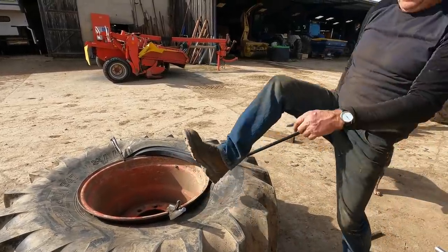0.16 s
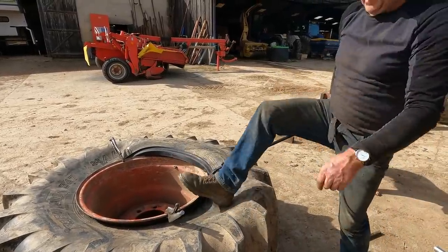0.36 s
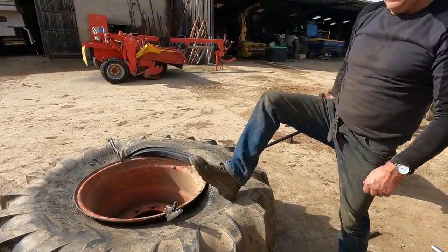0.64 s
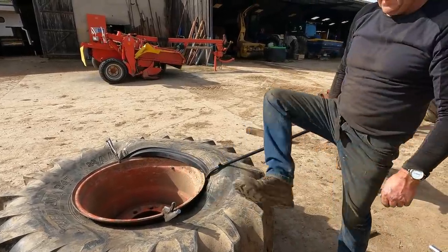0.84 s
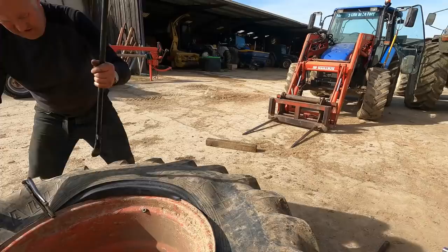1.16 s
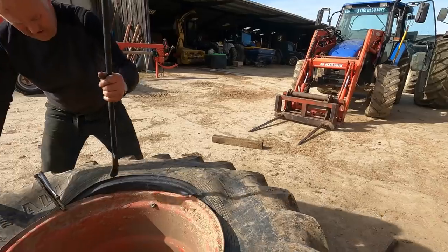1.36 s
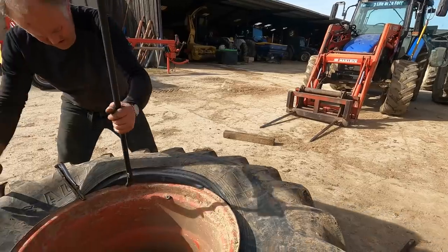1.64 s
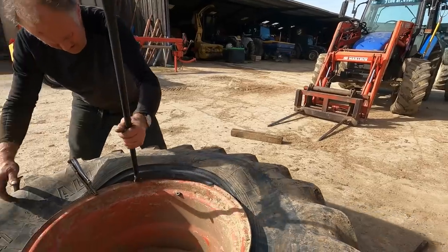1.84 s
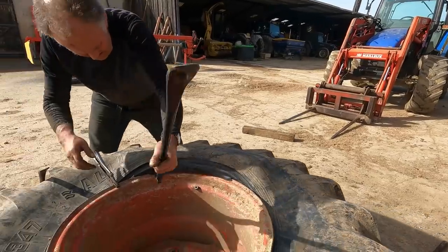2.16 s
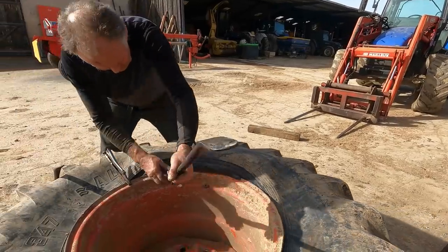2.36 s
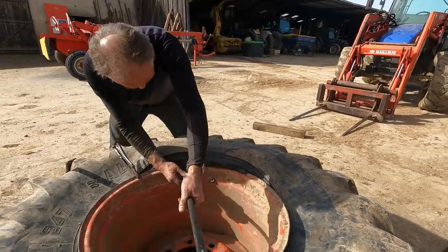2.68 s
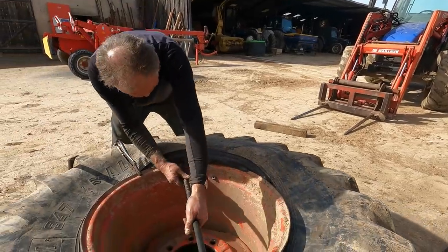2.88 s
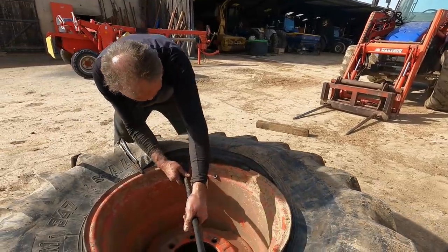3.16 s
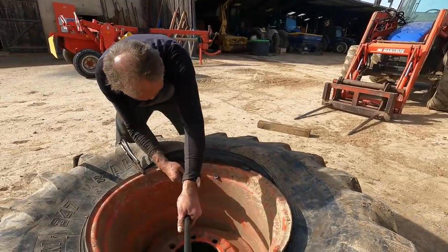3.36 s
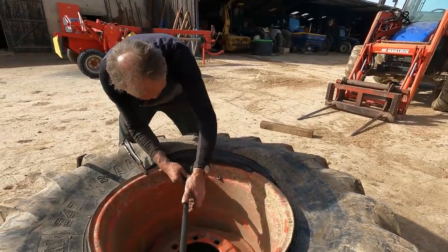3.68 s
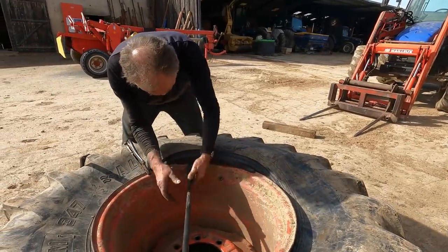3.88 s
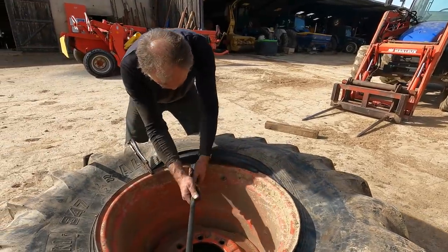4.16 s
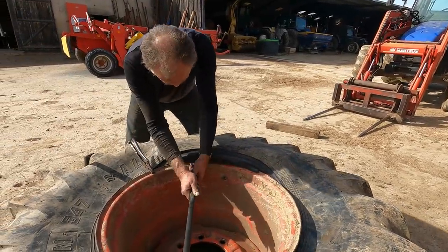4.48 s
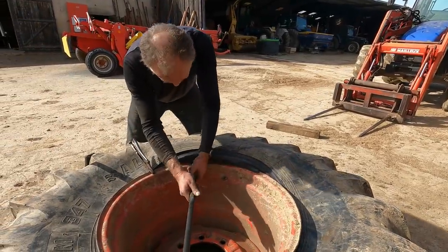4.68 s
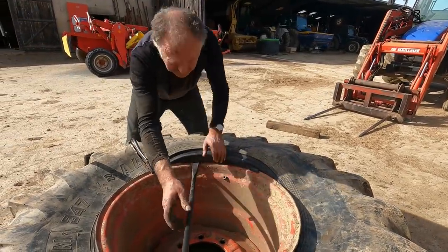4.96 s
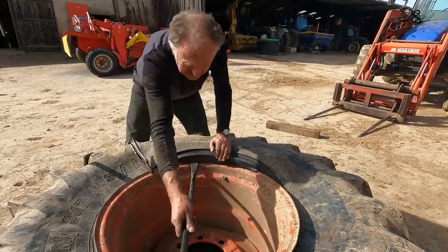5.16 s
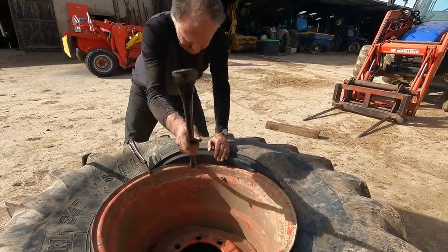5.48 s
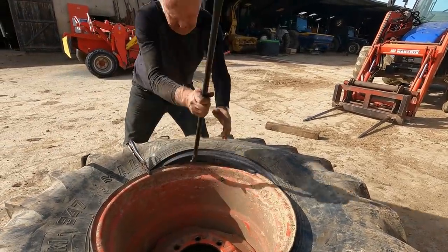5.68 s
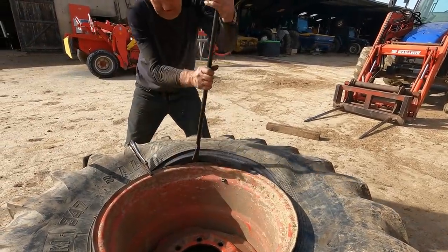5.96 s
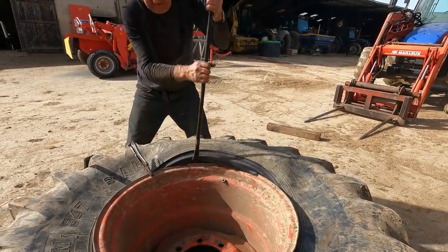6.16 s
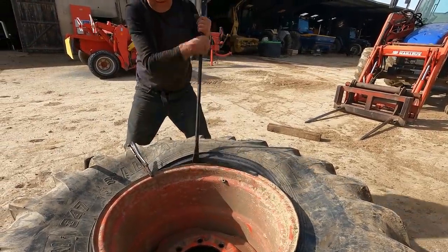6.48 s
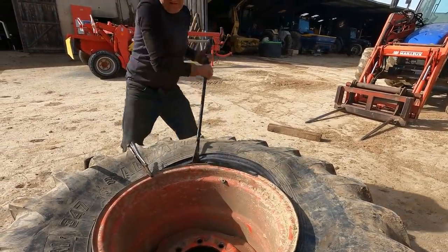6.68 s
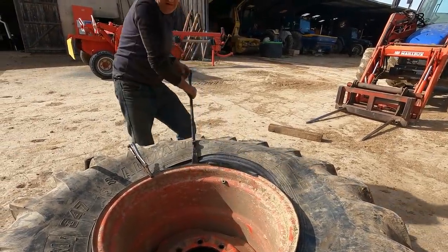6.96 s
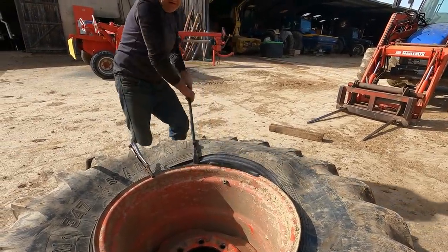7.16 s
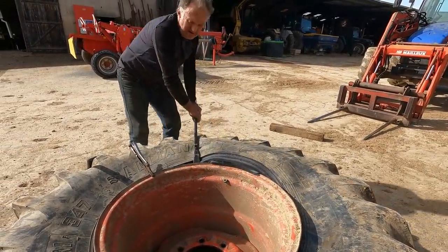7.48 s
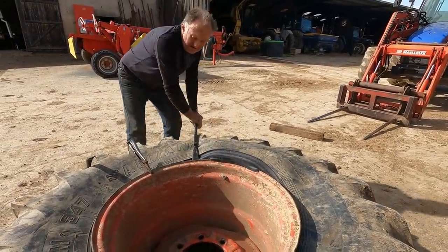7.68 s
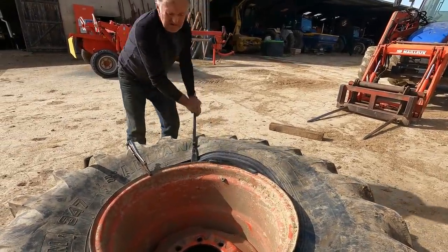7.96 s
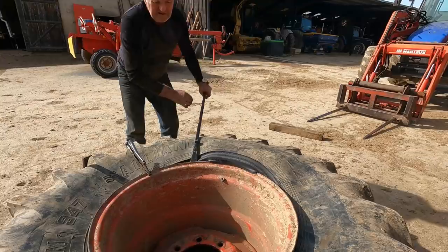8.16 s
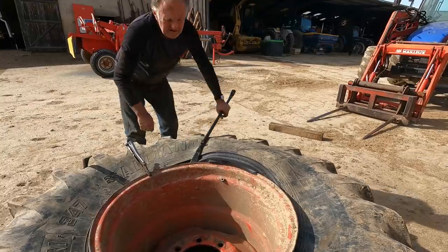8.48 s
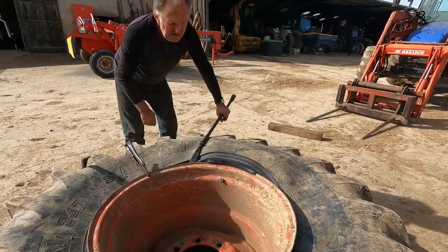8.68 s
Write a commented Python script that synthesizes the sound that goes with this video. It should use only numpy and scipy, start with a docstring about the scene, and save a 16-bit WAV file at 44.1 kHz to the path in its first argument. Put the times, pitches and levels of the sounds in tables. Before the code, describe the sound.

Steel tyre levers knock, clank and scrape on a heavy wheel rim, rubber thudding dully beneath, in a quiet open farmyard.

```python
"""Tyre levers on a tractor wheel

Steel levers prise a tyre off its wheel in a concrete farmyard. Chattering impulses drive modal bodies with
noise crowds: rim clang damped by rubber, tip tick, bar ring, tyre thud; then the bead settles and the wheel shudders.
Stick-slip trains drive scrapes, tyre flexing and brushed levers. Swelling grainy noise makes boot and sleeve
shuffles, decaying noise a faint shed echo, wavering noise the open air.
"""
import sys
import numpy as np
from scipy import signal
from scipy.fft import rfft, irfft
from scipy.io import wavfile

SR = 44100
rng = np.random.default_rng(int(sys.argv[2]) if len(sys.argv) > 2 else 0)


def unload_wav(signal):
    """Save mono or channel-first audio to the path in sys.argv[1] as 16-bit WAV at rate SR, clipped to [-1, 1]."""
    wavfile.write(
        sys.argv[1],
        SR,
        np.round(np.clip(np.atleast_2d(signal).T, -1, 1) * 32767).astype(np.int16),
    )


N = 389270

# Lever hits on rim: t/s, steel clang level/dB, tyre thud level/dB, tip tick level/dB,
# chatter time scale/s, contact-favoured f/Hz
BLOWS = [(.368, -31.5, -21, -36.5, 0.00082, 1450), (.401, -30, -45, -41, 0.0047, 1930),
         (.437, -29, -46, -29, 0.0017, 5500), (0.508, -35.5, -85, -41, 0.0037, 1930),
         (1.594, -54, -38.5, -53, 0.0023, 1400), (1.853, -18, -37.5, -30.5, 0.0011, 1860),
         (1.964, -36.5, -68, -62, 0.0031, 1510), (2.436, -34, -46.5, -46.5, 0.0033, 1470),
         (2.495, -24, -58, -34.5, 0.006, 1530), (2.547, -30, -51.5, -42.5, 0.0024, 1460),
         (3.014, -45.5, -19.5, -45, .0016, 1390), (3.027, -27, -55, -38, 0.0051, 1590),
         (3.124, -54, -58, -62, .0017, 1400), (3.818, -17.5, -36, -52, 0.0041, 1700),
         (3.855, -30, -44, -55, 0.0048, 1160), (4.204, -35, -24.5, -53, 0.0022, 1410),
         (5.727, -28, -29, -37.5, 0.0044, 1740), (5.807, -22.5, -23, -33, .003, 1900),
         (6.273, -39.5, -70, -34, 0.0011, 3670), (6.527, -16, -19.5, -24.5, .0012, 1560),
         (6.779, -31.5, -52, -37, 0.0017, 2130), (6.788, -28.5, -57, -31.5, 0.001895, 1880),
         (6.822, -45.5, -47.5, -42, 0.002, 2000), (6.874, -38.5, -69, -40, 0.0013, 2000),
         (7.024, -38.5, -71, -41.5, .001, 2140), (7.395, -45.5, -70, -45, .003, 1950),
         (7.463, -32.5, -56, -31, .0035, 1890), (7.54, -42, -71, -43.5, 0.0027, 2000),
         (7.773, -35.5, -64, -35, .0008, 2050), (7.92, -38.5, -57, -39, .005, 1820)]
# Lever slides on flange: start t/s, length/s, reference level/dB
SCRAPES = [(0.344, 0.1, -23), (0.451, 0.064, -35), (2.418, 0.02, -40), (2.499, 0.052, -27.5),
           (2.719, 0.087, -38.5), (3.787, 0.042, -32.5), (4.032, 0.096, -43), (4.119, 0.04, -29.5),
           (4.18, 0.023, -28.5), (4.418, 0.084, -25), (4.475, 0.056, -22.5), (4.751, 0.12, -39),
           (5.259, 0.052, -32), (5.615, 0.052, -35.5), (6.502, 0.017, -28.5), (7.28, 0.036, -34),
           (7.712, 0.031, -36.5)]
# Tyre flexing under lever or knee: start t/s, length/s, level/dB
FLEXES = [(.395, 0.042, -35), (1.27, 0.065, -46), (1.779, 0.082, -45.5), (3.528, 0.04, -31.5),
          (5.635, 0.023, -39.5), (6.68, 0.022, -39.5), (7.717, 0.017, -51), (7.835, 0.013, -48.5)]
# Brushes of a loosely held lever: t/s, reference level/dB, favoured f/Hz
BRUSHES = [(.911, -57.5, 6380), (1.195, -49.5, 2840), (1.243, -51, 2900), (1.29, -44, 7200),
           (1.318, -43.5, 5420), (1.54, -47.5, 5157), (1.575, -48.5, 5170), (1.865, -39, 2735),
           (1.906, -43.5, 2820), (2.493, -50, 4940), (3.82, -43.5, 4224), (3.831, -51.5, 5790),
           (4.128, -50, 3830)]
# Boots on gritty concrete, sleeves on rubber: middle t/s, half length/s, swell peak level/dB before grain
SHUFFLES = [(0.593, 0.1, -52.5), (0.742, 0.036, -52), (3.643, 0.065, -40.5), (4.79, 0.083, -49),
            (5.232, 0.039, -48.5), (5.97, .021, -40.5), (6.042, 0.038, -47.5), (6.436, 0.061, -50),
            (6.711, 0.035, -48.5), (7.321, 0.059, -46), (8.444, .088, -43)]

# Modes of each body: f/Hz, relative level/dB before scatter, t60/s before damping
DISH_MODES = [(590.4, 3.5, 0.34), (698, -62, 0.15), (827, -6.5, 0.17), (865, 6, 0.35), (1009, 6, 0.36),
              (1078, 10, 0.087), (1152, -1.5, 0.19)]
FLANGE_MODES = [(1344, -17.5, 0.17), (1493, 3, 0.12), (1537, -12.5, 0.4), (1686, -1, 0.11),
                (1720, -4, 0.18), (1790, -8, 0.28), (1940, -19, 0.16), (2165, -11, 0.22),
                (2210, 3.5, 0.076), (2460, -4.5, 0.14), (2659, -5, 0.11)]
TYRE_MODES = [(155.6, -0.5, 0.18), (182, 7.5, 0.088), (206.9, -5, 0.16), (264.4, 6, 0.081), (287, 6, 0.077),
              (319, -15, 0.28), (384, -6, 0.095), (464, -10, 0.1)]
LEVER_MODES = [(2400, -2, .3), (2720, 6.5, 0.3), (2950, 12, .26), (3510, 11, 0.14), (4165, 11.5, 0.14),
               (4830, -6.5, 0.43), (5160, -11, 0.28), (5380, -8, 0.58), (5860, -6.5, 0.22),
               (6430, -10, 0.29), (6500, -4, 0.27), (7120, -4.5, 0.32), (8200, -22, 0.29), (9700, -36, .35),
               (11000, -13, .33), (11200, -33, 0.3)]
TIP_MODES = [(2870, 1, 0.3), (3370, 7, 0.076), (3660, 4.5, 0.24), (3612, 9, 0.047), (3800, 0.5, 0.19),
             (4137, 9.5, 0.07), (4530, 4, 0.11), (4850, 5.5, 0.05), (5470, 4, 0.055)]

# Noise spectra of the sources: f/Hz, relative level/dB
TYRE_BAND = [(60, -11), (115, -28.5), (155, 4.5), (300, 10.5), (520, -2), (680, -6), (1200, -40)]
DISH_BAND = [(250, -26), (480, -67), (600, 11), (750, 1), (1100, -1), (1300, 4), (2200, -65)]
FLANGE_BAND = [(700, -14), (1200, -5), (1550, 5.5), (2250, 6.5), (2750, -9.5), (3500, -52), (6000, -50)]
TICK_BAND = [(1500, -11.5), (2800, 7), (3600, 3), (4600, -2), (6000, -10.5), (7200, -17), (10000, -67)]
SIZZLE_BAND = [(4500, 3), (7200, 7), (8300, -3), (10700, 5.5), (11800, -19), (13200, -11), (14500, -31)]
SHUFFLE_BAND = [(150, -8), (800, -8), (2000, 1.5), (3500, 4), (5000, -2), (7000, -9.5), (8500, -18.5),
                (10700, -14), (12000, -32), (14000, -37)]
ECHO_BAND = [(100, 27.5), (500, 0), (1800, 9), (4000, 15), (8000, 4), (14000, -16)]
YARD_BAND = [(59, -55), (100, -39), (134, -10), (171, 1), (254, -2.5), (481, -2), (556, -1), (952, -5.5),
             (1010, -8.5), (1380, -3.5), (1560, -7), (3360, -11.5), (8880, -36.5), (10700, -36),
             (14000, -57)]
# Spectra of slow level modulation: f/Hz, relative level/dB
GRAIN_BAND = [(1, 26), (150, -24), (600, -33), (5000, -66)]
WAVER_BAND = [(1, -44), (12, 22), (40, -51), (400, -100)]
# Open-air background: t/s, level/dB before offset and waver
AIR_LEVEL = [(0, -48.5), (1, -51), (2.3, -54), (3.3, -55.5), (4, -49.5), (5, -53.5), (7.1, -55.5), (8, -50),
             (8.83, -53.5)]

T = np.arange(int(.7 * SR)) / SR  # time base of one response, s
RUN_UP_S = .02  # creep before the main strike
CONTACT_BOOST_DB = 11
# the dish lies between flange and tyre, and follows both
DISH_TYRE_SHARE = .32
# a light touch skates over rust; the harder the clang, the less sizzle
FIRM_BLOW_DB, SIZZLE_DB, SIZZLE_LOSS_DB_PER_DB = -30, -15.5, .5
# ring time factor at equal thud and clang, and its fall in dB per dB of excess thud
RING_FACTOR, RUBBER_DAMPING_DB_PER_DB = .71, .39
SETTLE_AFTER_S, SETTLE_S, SETTLE_DB = .01486, .012, -9
SHUDDER_AFTER_S, SHUDDER_S, SHUDDER_STEEL_DB, SHUDDER_TYRE_DB = .05, .25, -23.5, -29.5
# from pick-up until pushed under the bead the lever is loose: more bar ring, less rust sizzle
LOOSE_FROM_S, LOOSE_TO_S = .8, 4.3
LOOSE_LEVER_DB, WEDGED_LEVER_DB, LOOSE_SIZZLE_DB = -29, -47, -12.5
GRIT_DB = -12.5  # rust grit re scrape reference
BRUSH_S = .021
TOP_HZ = 14200


def undb(db):
    """Amplitude ratio from dB."""
    return 10 ** (np.asarray(db) / 20)


def add(track, s, sound):
    """Mix a sound into the track from time s."""
    i = max(int(s * SR), 0)
    track[i:i + len(sound)] += sound[:max(N - i, 0)]


def level(x, db, length_s=0):
    """Set the rms over the first 40 ms, or over a longer contact."""
    n = int(max(length_s, .04) * SR)
    rms = np.sqrt(np.mean(x[:n] ** 2) + 1e-20)
    return x * undb(db) / rms


def noise(points, size):
    """Noise of rms 1, spectrum log-interpolated in f, nothing above the last point."""
    hz, db = np.transpose(points)
    f = np.maximum(np.fft.rfftfreq(size, 1 / SR), 1)
    gain = undb(np.interp(np.log(f), np.log(hz), db)) * (f < hz[-1])
    x = irfft(rfft(rng.standard_normal(size)) * gain, size)
    return x / x.std()


def fade(t60_s):
    """Exponential decay by 60 dB in t60_s."""
    return np.exp(-np.log(1000) * T / max(t60_s, 1e-3))


def favour(modes, hz, width_hz, boost_db):
    """The contact weights modes near one frequency; a negative boost weakens them."""
    return [(f, db + boost_db * np.exp(-((f - hz) / width_hz) ** 2), t60) for f, db, t60 in modes]


def body(modes, band, crowd_db, crowd_t60_s, ring=1, crack=1.0, split=.0117):
    """Impulse response: clear modes, reweighted per contact, over a damped crowd that opens with a crack."""
    scatter_db, crack_t60_s = 3.5, .01
    chance = rng.standard_normal((len(modes), 3))
    clear = 0
    for (hz, db, t60_s), (size, detune, turn) in zip(modes, chance):
        # imperfect roundness: a weaker, slightly detuned twin
        twin_hz = hz * (1 + split * detune)
        wave = np.sin(2 * np.pi * hz * T) + .5 * np.sin(2 * np.pi * twin_hz * T)
        gain = np.sign(turn) * undb(db + scatter_db * size)
        onset = 1 - np.exp(-hz * T)
        clear = clear + gain * wave * fade(t60_s * ring) * onset
    middle_hz = np.mean([hz for hz, db, t60_s in modes])
    swell = 1 - np.exp(-(middle_hz * T) ** 2)  # about one cycle to get moving
    decay = fade(crowd_t60_s * ring) + crack * fade(crack_t60_s)
    crowd = noise(band, len(T)) * swell * decay
    return level(clear, 0) + level(crowd, crowd_db)


def drive(force, response):
    """A contact force sets a body ringing: convolution."""
    return signal.fftconvolve(force, response)[:len(T)]


def chatter(scale_s, bounce=.67, creep=.29, count=9):
    """The lever creeps in growing jerks, strikes at RUN_UP_S, then rebounds."""
    before, after = rng.exponential(1, (2, count))
    jerk, rebound = rng.standard_normal((2, count))
    when_s = RUN_UP_S + scale_s * np.concatenate([-before * 1.6, [0], after * 1.3])
    jerks = creep * jerk * np.exp(-before / 2)
    rebounds = bounce * rebound * np.exp(-after / 2)
    size = np.concatenate([jerks, [1], rebounds])
    return np.bincount(np.clip(when_s * SR, 0, len(T) - 1).astype(int), size, len(T))


def slips(length_s, rate_hz, uneven_db=4, count=160):
    """Stick-slip: uneven jerks that swell and die within the stroke."""
    when_s = np.cumsum(rng.gamma(3, 1 / (3 * rate_hz), count))
    size = undb(uneven_db * rng.standard_normal(count))
    when_s = when_s - when_s[0]
    stroke = np.clip(when_s / length_s, 0, 1)
    swell = np.sin(np.pi * (.1 + .8 * stroke)) * (when_s < length_s)
    force = np.zeros(len(T))
    force[np.minimum(when_s * SR, len(T) - 1).astype(int)] = size * swell
    return force


def blows():
    """The lever snaps onto the rim: tip ticks, flange and dish clang, bar rings, tyre thuds and settles."""
    out = np.zeros(N)
    for s, clang_db, thud_db, tick_db, chatter_s, hz in BLOWS:
        rubber_db = thud_db - clang_db
        ring = min(RING_FACTOR * undb(-RUBBER_DAMPING_DB_PER_DB * rubber_db), 1)
        dish_db = clang_db + DISH_TYRE_SHARE * rubber_db
        loose = LOOSE_FROM_S < s < LOOSE_TO_S
        sizzle_db = tick_db + SIZZLE_DB + loose * LOOSE_SIZZLE_DB
        sizzle_db -= SIZZLE_LOSS_DB_PER_DB * (clang_db - FIRM_BLOW_DB)
        bar_db = clang_db + (LOOSE_LEVER_DB if loose else WEDGED_LEVER_DB)

        force = chatter(chatter_s)
        flange_modes = favour(FLANGE_MODES, hz, width_hz=360, boost_db=CONTACT_BOOST_DB)
        flange = body(flange_modes, FLANGE_BAND, crowd_db=-1, crowd_t60_s=.13, ring=ring)
        dish = body(DISH_MODES, DISH_BAND, crowd_db=1.5, crowd_t60_s=.14, ring=ring)
        tip_modes = favour(TIP_MODES, hz, width_hz=360, boost_db=26)
        tick = body(tip_modes, TICK_BAND, crowd_db=3.5, crowd_t60_s=.11, crack=3.5, split=.0093)
        sizzle = noise(SIZZLE_BAND, len(T)) * (fade(.11) + fade(.024))
        tyre_modes = favour(TYRE_MODES, 208, width_hz=30, boost_db=5.5)
        thud = body(tyre_modes, TYRE_BAND, crowd_db=2.5, crowd_t60_s=.11, ring=ring)
        bar = body(LEVER_MODES, TICK_BAND, crowd_db=-9, crowd_t60_s=.12, split=.00048)
        parts = [(flange, clang_db), (dish, dish_db), (tick, tick_db),
                 (sizzle, sizzle_db), (thud, thud_db), (bar, bar_db)]
        for part, db in parts:
            add(out, s - RUN_UP_S, level(drive(force, part), db))

        # bead settles on its seat
        settling = drive(slips(SETTLE_S, rate_hz=269.5), thud)
        add(out, s + SETTLE_AFTER_S, level(settling, thud_db + SETTLE_DB))

        # wheel shudders
        shudder = slips(SHUDDER_S, rate_hz=430) * fade(.23)
        shaken_modes = favour(DISH_MODES, 606, width_hz=60, boost_db=-.5)
        wheel = body(shaken_modes, DISH_BAND, crowd_db=9.5, crowd_t60_s=.11)
        wheel = wheel + undb(-7.5) * body(FLANGE_MODES, FLANGE_BAND, crowd_db=7.5, crowd_t60_s=.3)
        for part, db in (wheel, dish_db + SHUDDER_STEEL_DB), (thud, thud_db + SHUDDER_TYRE_DB):
            add(out, s + SHUDDER_AFTER_S, level(drive(shudder, part), db, SHUDDER_S))
    return out


def scrapes():
    """The lever judders along the rusty flange: stick-slip drives steel, tyre and grit."""
    out = np.zeros(N)
    for s, length_s, ref_db in SCRAPES:
        force = slips(length_s, rate_hz=380)
        flange_modes = favour(FLANGE_MODES, 1930, width_hz=200, boost_db=-8.5)
        flange = body(flange_modes, FLANGE_BAND, crowd_db=-2.5, crowd_t60_s=.22, ring=.76)
        dish = body(DISH_MODES, DISH_BAND, crowd_db=2, crowd_t60_s=.17)
        tyre = body(TYRE_MODES, TYRE_BAND, crowd_db=-4.5, crowd_t60_s=.035)
        grit = body(TIP_MODES, TICK_BAND, crowd_db=4, crowd_t60_s=.027)
        grit = grit + level(noise(SIZZLE_BAND, len(T)) * fade(.096), -13)
        parts = [(flange, ref_db - 7), (dish, ref_db - 10), (tyre, ref_db - 18.5), (grit, ref_db + GRIT_DB)]
        for part, db in parts:
            add(out, s, level(drive(force, part), db, length_s))
    return out


def flexes():
    """The stiff bead shifts on its seat by stick-slip; the hollow tyre rumbles."""
    out = np.zeros(N)
    for s, length_s, db in FLEXES:
        tyre = body(TYRE_MODES, TYRE_BAND, crowd_db=5, crowd_t60_s=.1, ring=.66)
        add(out, s, level(drive(slips(length_s, rate_hz=460), tyre), db, length_s))
    return out


def levers():
    """A free steel bar rings in high bending modes; rubbing locks onto one of them."""
    out = np.zeros(N)
    rise = np.minimum(T / BRUSH_S, 1)
    for s, ref_db, hz in BRUSHES:
        bar_modes = favour(LEVER_MODES, hz, width_hz=1400, boost_db=CONTACT_BOOST_DB)
        bar = body(bar_modes, TICK_BAND, crowd_db=4.5, crowd_t60_s=.14, split=.00079)
        sung_modes = favour(LEVER_MODES, hz, width_hz=72, boost_db=25)
        sung = rise * body(sung_modes, TICK_BAND, crowd_db=-20, crowd_t60_s=.1, split=0)
        rubbed = drive(slips(BRUSH_S, rate_hz=900), bar)
        add(out, s, level(rubbed, ref_db - 1) + level(sung, ref_db - 2))
    return out


def shuffles():
    """Soft swishes as the weight shifts: band noise with bell-shaped swells and random grain."""
    t = np.arange(N) / SR
    swell = sum(undb(db) * np.exp(-((t - s) / half_s) ** 2) for s, half_s, db in SHUFFLES)
    grain = undb(2 * noise(GRAIN_BAND, N))
    return swell * grain * noise(SHUFFLE_BAND, N)


def sheds(x, db=-22, t60_s=.73, build_s=.0048):
    """Thin, dull echo from the buildings: convolution with noise that builds up, then decays."""
    tail = noise(ECHO_BAND, len(T)) * fade(t60_s) * (1 - np.exp(-T / build_s))
    return undb(db) * signal.fftconvolve(x, tail / np.linalg.norm(tail))[:N]


def air():
    """Faint outdoor background: band noise whose level drifts and wavers."""
    s, db = np.transpose(AIR_LEVEL)
    drift_db = np.interp(np.arange(N) / SR, s, db) + 1
    waver_db = noise(WAVER_BAND, N)
    return noise(YARD_BAND, N) * undb(drift_db + waver_db)


def scene():
    """Work straight ahead plus echo and air; both channels alike."""
    work = blows() + scrapes() + flexes() + levers() + shuffles()
    return np.tile(work + sheds(work) + air(), (2, 1))


def record(dry):
    """Microphone: low cut, narrow dip from its port, clipping at full scale, top cut."""
    low_cut = signal.butter(8, 134, "high", fs=SR, output="sos")
    x = signal.sosfilt(low_cut, dry)
    port_hz, port_q = 9100, 5
    x = signal.lfilter(*signal.iirnotch(port_hz, port_q, fs=SR), x)
    top_cut = signal.ellip(8, .2, 70, TOP_HZ, fs=SR, output="sos")
    return signal.sosfilt(top_cut, np.clip(x, -1, 1))


dry = scene()
out = record(dry)
unload_wav(out)
```